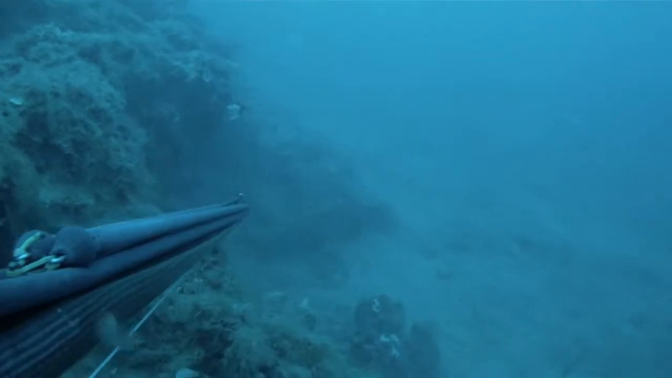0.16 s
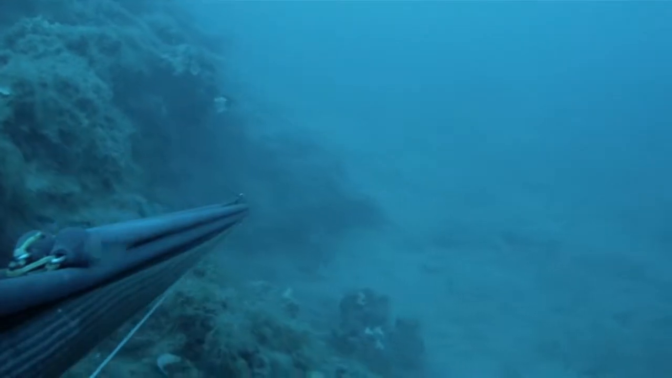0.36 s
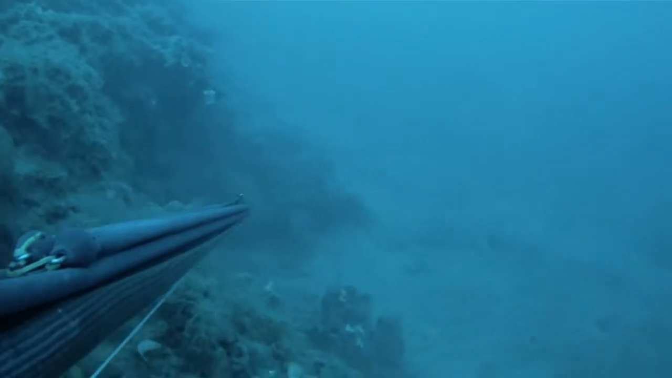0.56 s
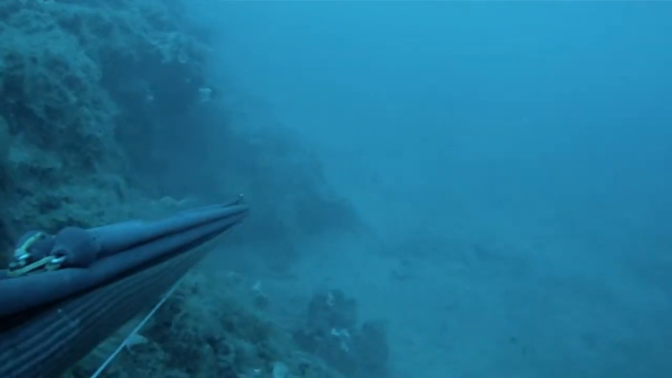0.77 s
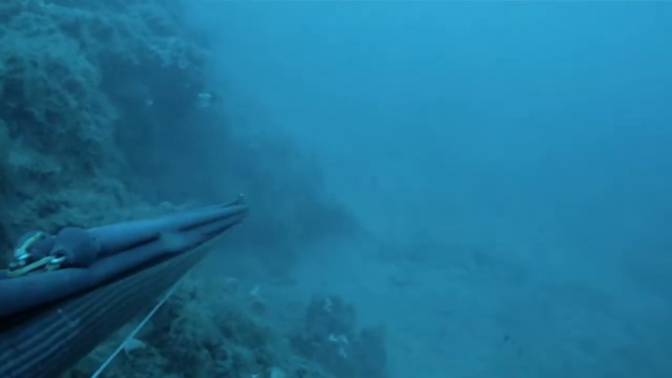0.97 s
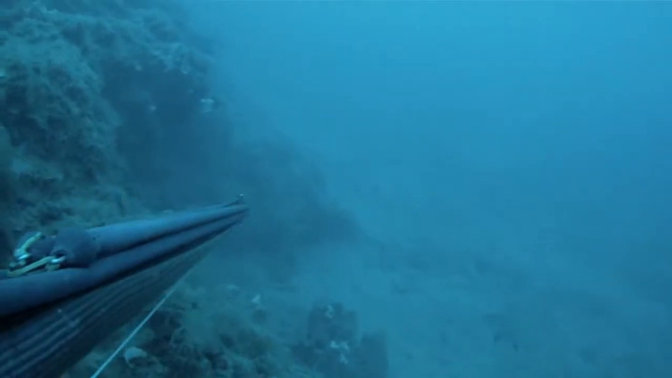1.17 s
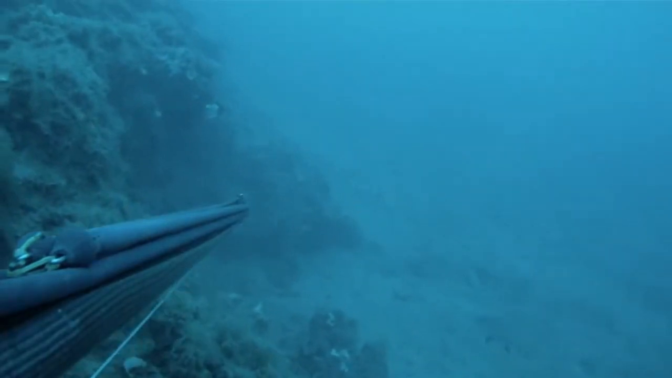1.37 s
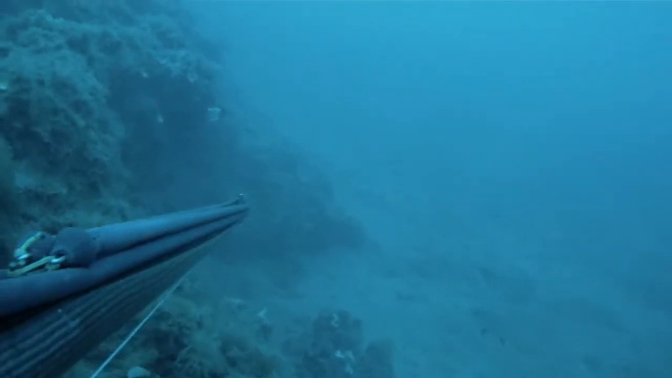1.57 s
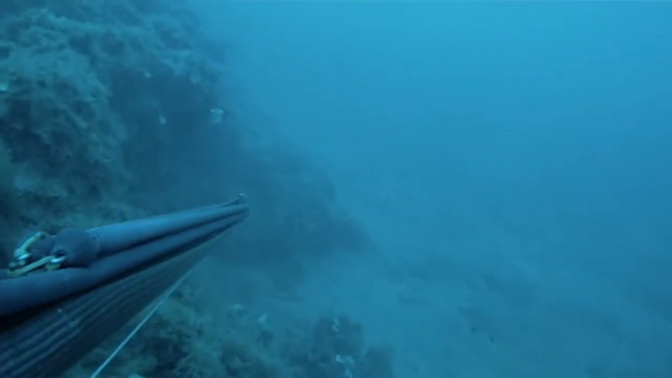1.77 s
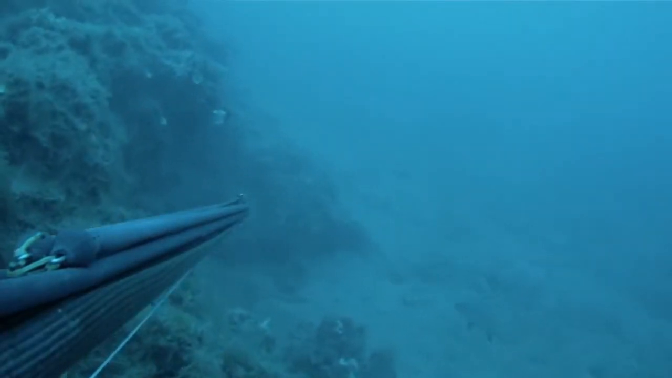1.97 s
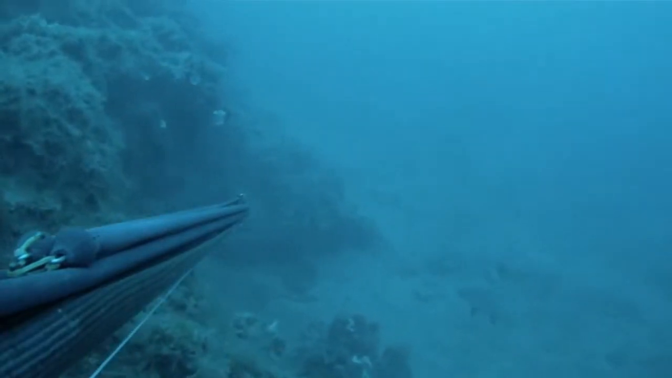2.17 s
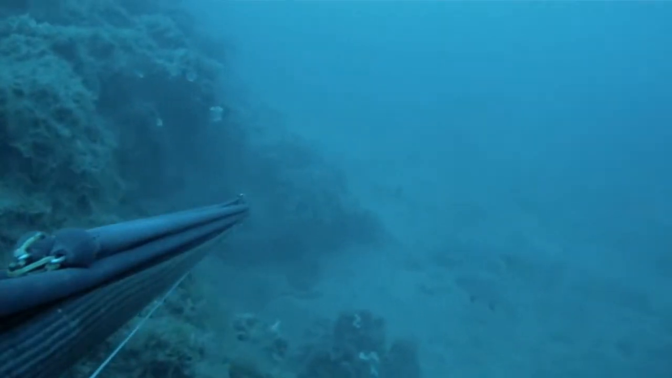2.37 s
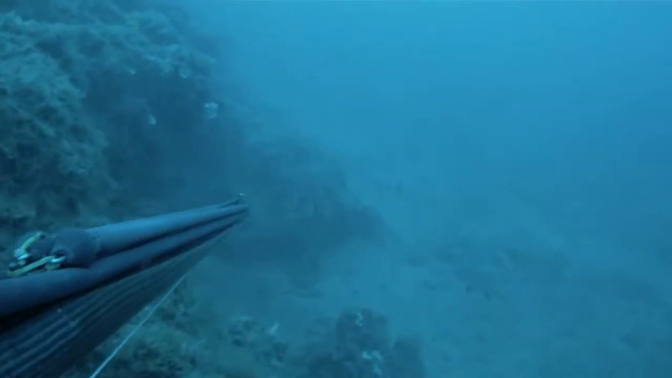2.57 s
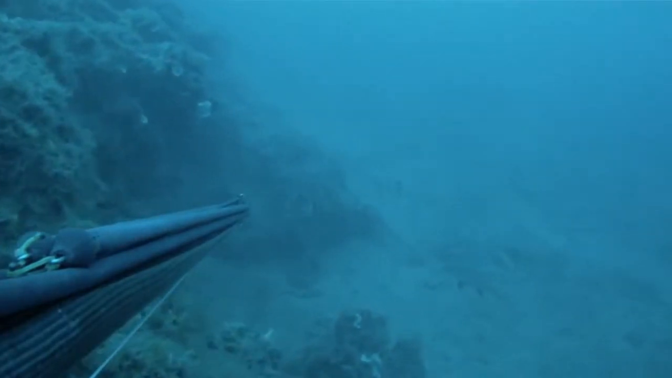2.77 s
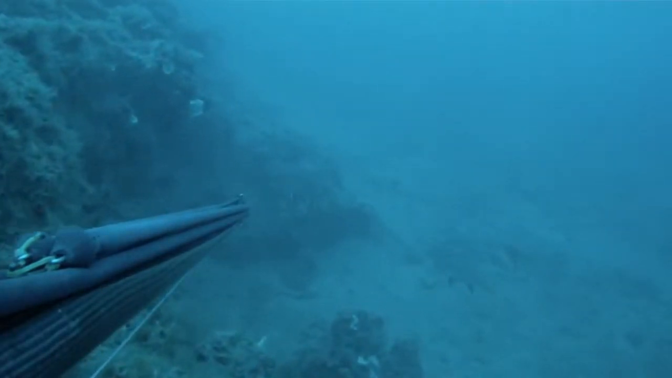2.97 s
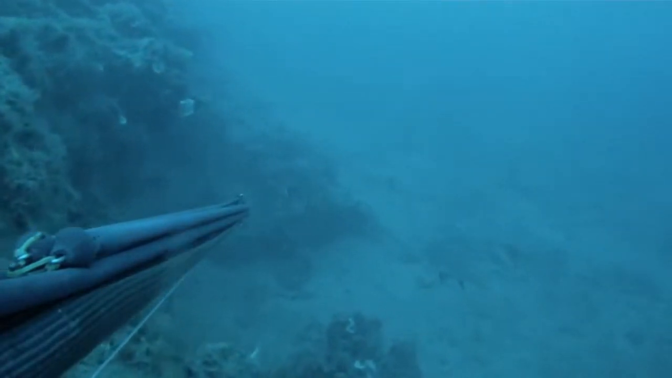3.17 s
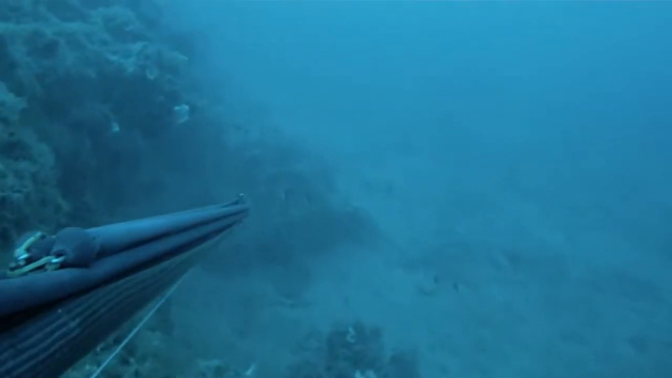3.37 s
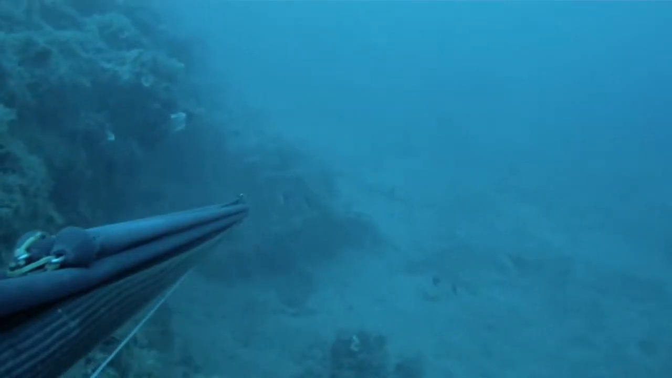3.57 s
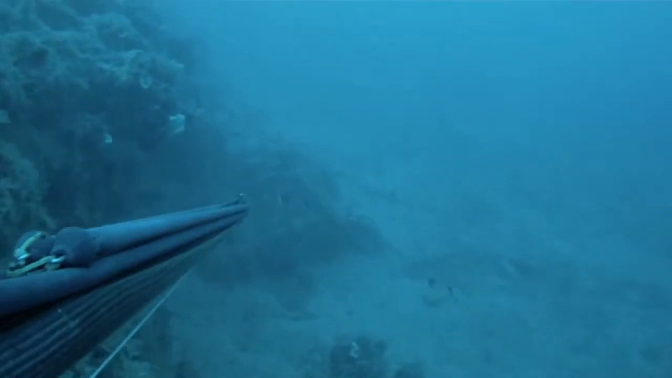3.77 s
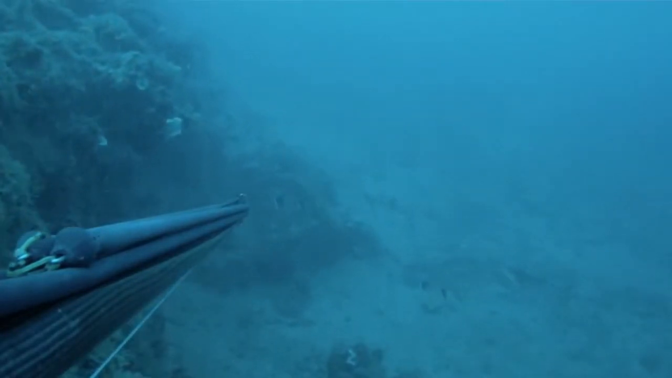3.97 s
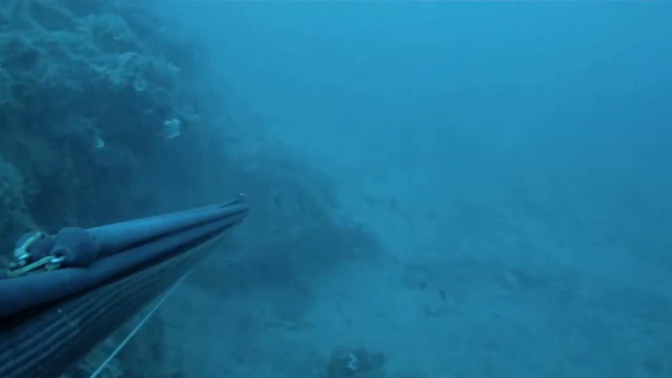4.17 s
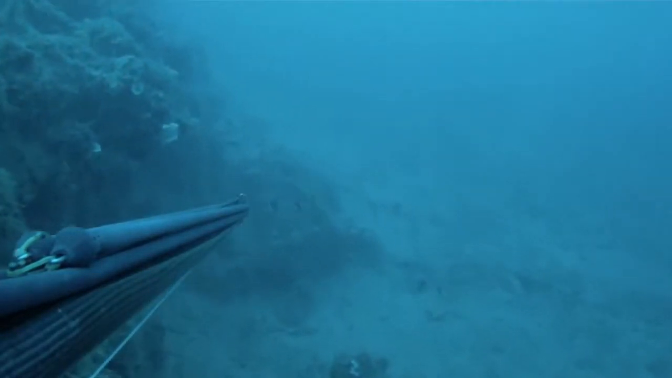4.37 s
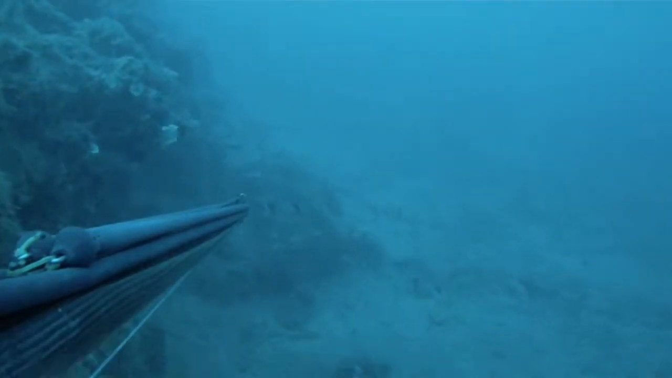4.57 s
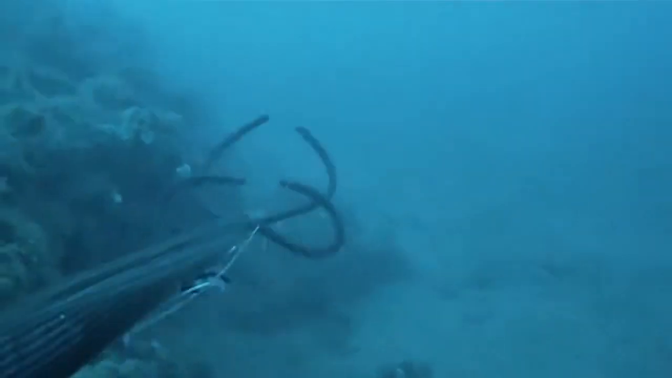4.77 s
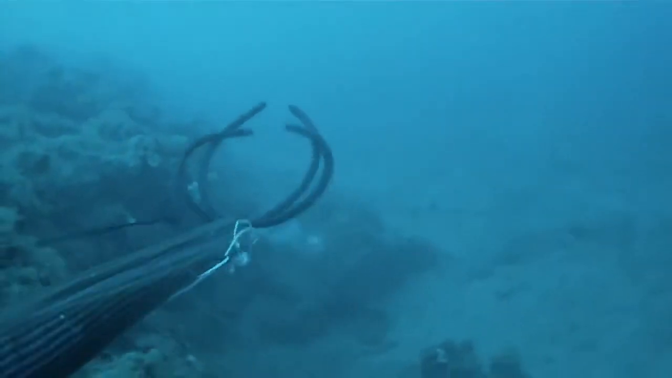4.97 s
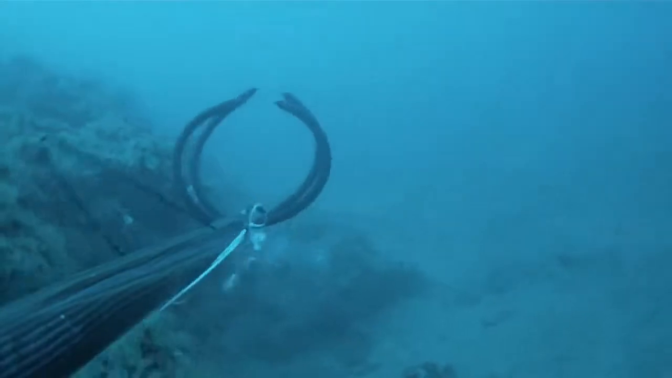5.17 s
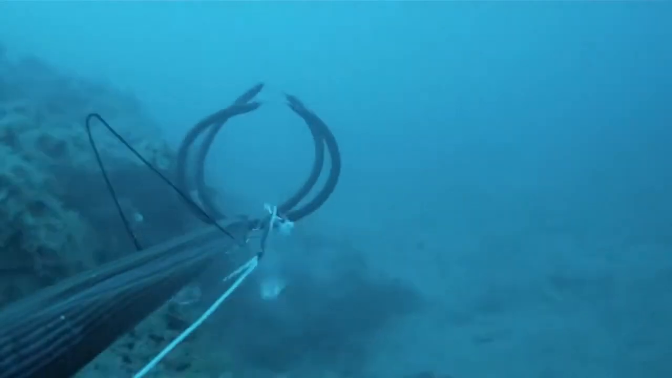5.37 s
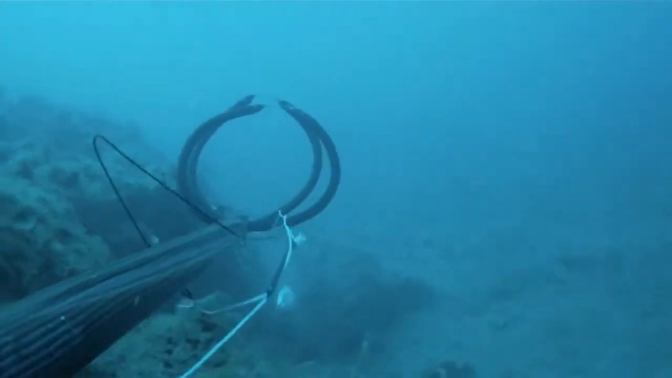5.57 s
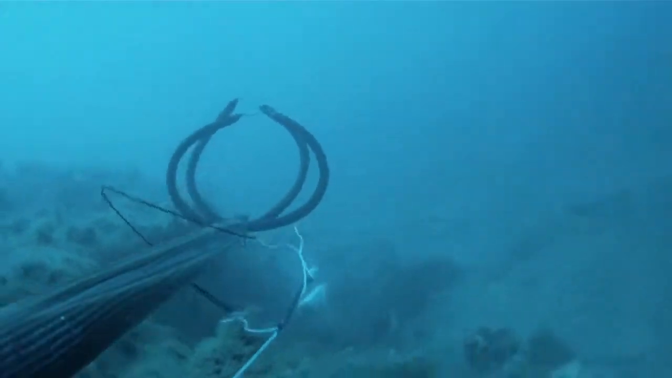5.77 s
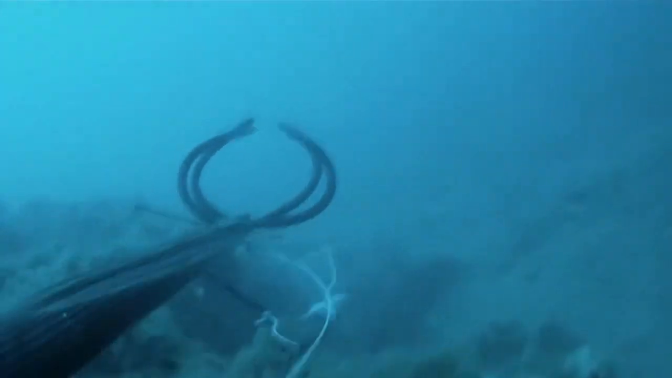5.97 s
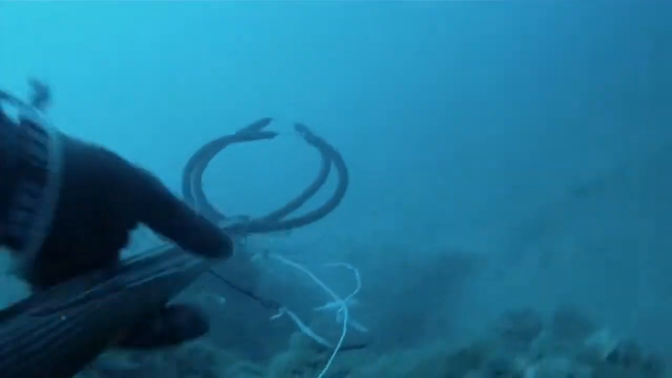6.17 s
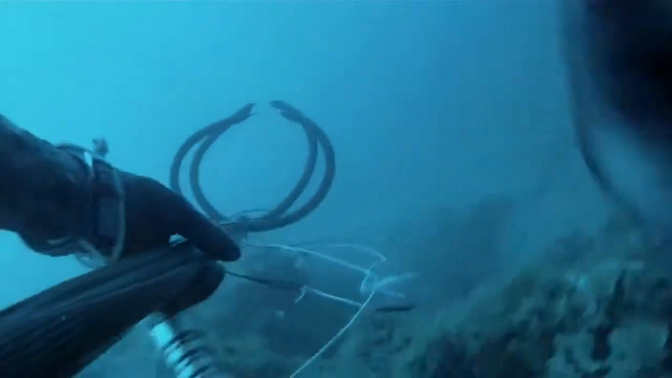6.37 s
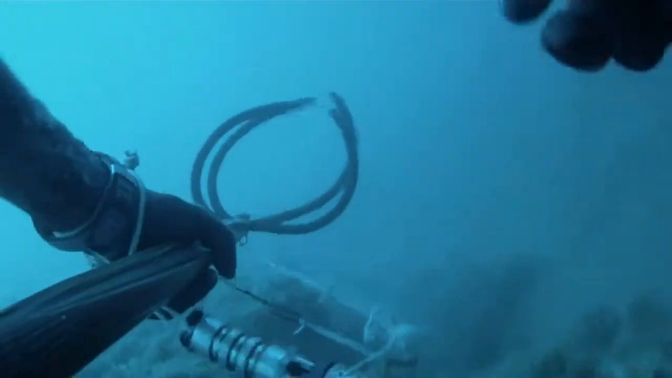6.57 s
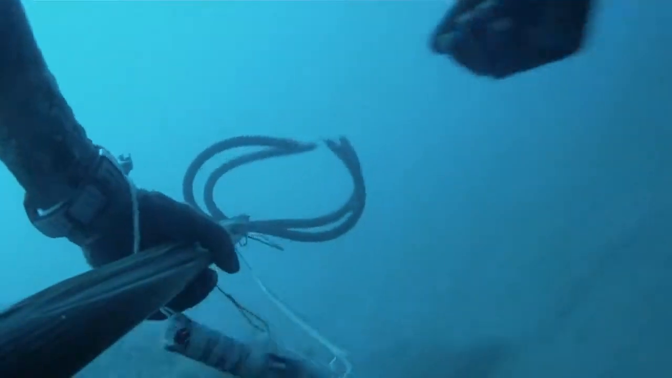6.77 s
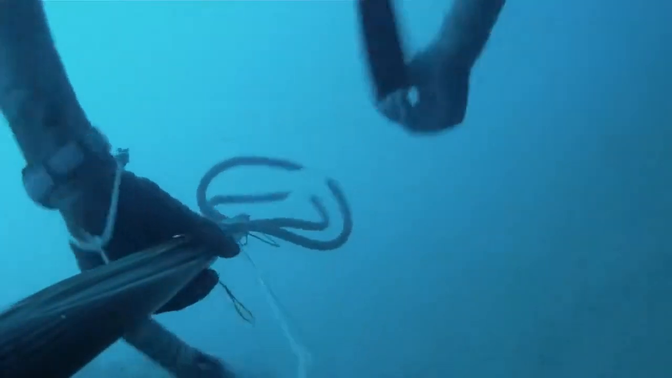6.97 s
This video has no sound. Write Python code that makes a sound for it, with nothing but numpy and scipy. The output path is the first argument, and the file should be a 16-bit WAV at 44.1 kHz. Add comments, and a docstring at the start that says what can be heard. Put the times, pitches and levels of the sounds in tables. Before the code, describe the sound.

Faint underwater hiss with tiny shrimp clicks, then a speargun fires with a loud rattling snap, followed by knocks and rubbing.

```python
"""Speargun shot over a reef

A camera in a plastic housing rides on a speargun. Countless far snaps merge into a hiss, near shrimp
ping in the housing's resonances, and a faint hum sits underneath. The gun fires at 4.6 s: the spear
grates along its track and the jolts overload the microphone, which clips and cuts out. Then water
rushes past the moving gun while line and hands rub and knock it."""
import sys
import numpy as np
from scipy import signal
from scipy.fft import rfft, irfft, next_fast_len
from scipy.io import wavfile
from scipy.ndimage import uniform_filter1d, map_coordinates

SR = 44100
rng = np.random.default_rng(int(sys.argv[2]) if len(sys.argv) > 2 else 0)


def store_pcm(level_fs):
    """Save levels as 16-bit WAV."""
    pcm = np.round(np.clip(level_fs, -1, 1) * 32767).astype(np.int16)
    wavfile.write(sys.argv[1], SR, np.atleast_2d(pcm).T)


N = 310023
TIME = np.arange(N) / SR


def amp(db):
    return 10 ** (np.asarray(db) / 20)


def fader(rows):
    """A level in dB for every sample, gliding between (seconds, dB) points."""
    return np.interp(TIME, *np.transpose(rows))


def wobble(rate):
    """A smooth random curve through rate points a second."""
    return map_coordinates(rng.standard_normal(int(N * rate / SR) + 4), [TIME * rate])


def filtered(x, response):
    """Shape a track with a gain given as a function of frequency."""
    size = next_fast_len(N + SR // 2)
    return irfft(rfft(x, size) * response(np.fft.rfftfreq(size, 1 / SR)), size)[:N]


def rush(spectrum, peaks=(), lumps_db=0):
    """Noise of rms 1 with a (Hz, dB) colour and narrow peaks, roughened by lumps_db."""
    points_hz, points_db = np.transpose(spectrum)

    def colour(hz):
        peaks_db = sum(db / (1 + (2 * (hz - centre) / width) ** 2) for centre, width, db in peaks)
        return amp(np.interp(np.log(hz + 1), np.log(points_hz + 1), points_db) + peaks_db)

    noise = filtered(rng.standard_normal(N) * amp(lumps_db), colour)
    return noise / np.sqrt(np.mean(noise ** 2) + 1e-20)


def swells(events, rise_s, fall_s=None):
    """Gain that rises to each event, holds and falls; rise and fall are times for 60 dB."""
    gain = np.zeros(N)
    for start, db, hold, *own_fall in events:
        before = (start - TIME) / rise_s
        after = (TIME - start - hold) / (fall_s or own_fall[0])
        gain += amp(db - 60 * np.maximum(np.maximum(before, after), 0))
    return gain


def add(track, start, sound):
    """Mix a sound into a track at start seconds."""
    part = track[round(start * SR):][:len(sound)]
    part += sound[:len(part)]


# The sea's hiss through the housing. Each row: frequency in Hz, relative level in dB.
HISS_COLOUR = [(150, -50.5), (250, -18.5), (429, -13.5), (474, -10), (524, -11.5), (815, -8), (926, -3.5),
               (1110, -12), (1590, -7), (2000, -21.5), (2370, -19), (3100, -23), (4180, -20.5), (4960, -31),
               (7500, -39.5), (9750, -83), (16500, -120)]
# The housing's resonances. Each row: centre in Hz, width in Hz, boost in dB.
HOUSING_PEAKS = [(944, 85, 6), (1398, 120, 6), (1555, 76, 7.5), (2330, 90, 4), (4180, 130, 3.5)]
# The low bed of water on the housing. Each row: frequency in Hz, relative level in dB.
RUMBLE_COLOUR = [(12, -52), (20, -11), (44, -14.5), (184, -19.5), (218, -13), (300, -21.5), (390, -67),
                 (660, -120)]
def sea():
    """Countless far snaps merge into a hiss; water pushing the housing adds a rumble."""
    flicker_db = wobble(5.6) + 0.99 * wobble(63)
    hiss = amp(-52) * rush(HISS_COLOUR, HOUSING_PEAKS, flicker_db)
    return hiss + amp(-72.5) * rush(RUMBLE_COLOUR)


# The hum's fader ride. Each row: time in seconds, rms level in dB.
HUM_LEVELS = [(0, -77.5), (1.15, -74.5), (1.3, -68.5), (4.6, -71), (4.7, -86), (7.03, -100)]
def hum(hz=215.3):
    """A faint wavering tone that drops away at the shot."""
    level_db = fader(HUM_LEVELS) + 1.5 * wobble(5.4)
    return amp(level_db) * np.sqrt(2) * np.sin(2 * np.pi * hz * TIME)


# The nearest shrimp. Each row: start in seconds, level in dB, pitch in Hz.
NEAR_SNAPS = [(0.2929, -45, 3950), (0.6484, -43.5, 4200), (0.756, -44, 3430), (0.7753, -39, 3970),
              (1.005, -50, 4260), (1.2567, -55, 4060), (1.2692, -39, 4170), (1.665, -50, 3720),
              (1.8229, -46, 3730), (2.1287, -49, 3460), (2.3677, -45, 4150), (2.426, -41, 4150),
              (3.7036, -49, 3690), (4.0449, -48, 4190), (4.1047, -45, 3680), (4.1352, -48, 4170)]
def shrimp(far_count=24, ring_s=0.013, echo_s=0.008, echo_db=-7):
    """Each snap is a short two-tone ping with a second just behind; farther shrimp snap at random."""
    out, t = np.zeros(N), np.arange(SR // 50) / SR
    far = rng.uniform((0, -56, 3500), (N / SR, -51, 4300), (far_count, 3))
    for start, db, hz in [*NEAR_SNAPS, *far]:
        lower_hz = rng.uniform(0.83, 0.91) * hz
        ping = np.sin(2 * np.pi * hz * t) + 0.71 * np.sin(2 * np.pi * lower_hz * t)
        ping *= (1 - np.exp(-t / 0.00032)) * amp(-60 * t / ring_s)
        add(out, start, amp(db) * ping)
        add(out, start + echo_s, amp(db + echo_db) * ping)
    return out


# The gun's ringing modes. Each row: pitch in Hz, level in dB, seconds to fade 60 dB.
GUN_MODES = [(345, -16.5, 0.037), (600, -16.5, 0.14), (856.6, -4, 0.071), (936.3, 9, 0.029),
             (1050, 3, 0.024), (1281, -1, 0.044), (1571, 8.5, 0.019), (1790, -4.5, 0.042),
             (2380, -5, 0.054), (2720, -6, 0.032), (3170, -31, 0.02), (4030, 0.5, 0.021)]
def gun_ring(centre_hz, spread, contact_s, grip_s=0.11, attack_s=0.0003):
    """A rough contact shakes the modes near centre_hz; the ring comes out with a peak of 1."""
    t = np.arange(SR // 10) / SR
    ring = np.zeros(len(t))
    for hz, db, fade_s in GUN_MODES:
        mode_db = db + rng.normal(0, 4.9) - 10 * (np.log2(hz / centre_hz) / spread) ** 2
        ring += amp(mode_db - 60 * t / fade_s) * np.sin(2 * np.pi * hz * t)
    ring *= amp(-60 * t / grip_s) * (1 - np.exp(-t / attack_s))  # hand and water damp every mode
    slips = np.zeros(SR // 50)  # the contact is a handful of small slips
    count = len(slips[::19])
    slips[::19] = rng.uniform(0.29, 1, count) * rng.choice([-1, 1], count)
    ring = signal.fftconvolve(ring, slips[:round(contact_s * SR) + 1])
    low_cut = signal.butter(2, centre_hz / 2 ** (1.2 * spread), "high", fs=SR, output="sos")
    ring = signal.sosfilt(low_cut, ring)
    return ring / np.max(np.abs(ring))


# Spear, line, tackle and hands striking the gun. Each row: start in seconds, level in dB,
# centre pitch in Hz, spread in octaves, contact time in seconds.
BLOWS = [(0.803, -39, 304, 0.69, .004), (0.948, -36.5, 328, 0.7, .004), (2.975, -24, 800, 1.5, .0003),
         (4.6395, 7.5, 1310, 0.85, .0036), (4.659, 21, 1300, 1.1, .0068), (4.6781, 11.5, 1310, 1.5, .004),
         (4.6923, 13, 1200, 1.5, .005), (4.7074, 7.5, 1400, 1.5, .001), (4.7119, 8.5, 1400, 0.56, .006),
         (4.728, 10, 1200, 1, .006), (4.739, 6, 1400, 0.67, .0026), (4.746, 8, 1410, 0.6, .01),
         (4.758, 10.5, 1400, 0.52, .003), (4.7678, 6.5, 1390, 1.2, .004), (4.7748, 8, 1430, 0.94, .002),
         (4.7815, 12, 1490, 0.49, .004), (4.795, 2.5, 1530, 0.92, .004), (4.82, 2.5, 1440, 0.47, .004),
         (4.831, -2, 900, 0.7, .004), (4.847, -8, 807, 0.48, .004), (4.888, -7, 950, .6, .004),
         (4.891, -8, 3200, .17, .002), (4.931, -16, 1500, 0.49, .004), (4.992, -19, 923, 0.33, .01),
         (5.086, -27.5, 1390, 0.63, .004), (5.154, -24, 955, 0.55, .004), (5.215, -20, 884, 0.8, .004),
         (5.273, -25.5, 915, 0.68, .004), (5.434, -16, 1385, 0.23, .004), (5.443, -17, 960, 0.82, .004),
         (5.478, -16, 939, 0.46, .004), (5.5, -16, 940, 0.29, .004), (5.564, -23.5, 1350, 0.49, .004),
         (5.599, -23.5, 939, 0.6, .004), (5.822, -24, 800, 0.89, .002), (5.944, -29, 950, .4, .008),
         (6.013, -7, 1500, 0.91, .005), (6.0251, 2, 1840, 0.29, .0027), (6.033, 7, 1000, 1.3, .002),
         (6.12, -22, 1130, 1, .004), (6.34, -34, 893, 0.8, .004), (6.368, 17, 866, .5, .009),
         (6.404, 18, 880, 0.45, .004), (6.422, 6, 850, .3, .003), (6.442, 13, 860, 0.26, .004),
         (6.452, 1.5, 825, 0.3, .0038), (6.526, -15.5, 1480, 0.53, .004), (6.539, -13.5, 1520, 0.62, .004),
         (6.6026, 4, 1000, 1.3, .0004)]
def knocks(tick_count=10, thud_hz=480, soft_hz=2200, hard_hz=12700, hard_db=12):
    """Each blow rings the gun over a dull thud; only the heaviest keep their bright top."""
    out, t = np.zeros(N), np.arange(SR // 10) / SR
    # After the shot the loose line ticks on the barrel at random.
    ticks = [(start, db, 940, 0.6, 0.004)
             for start, db in rng.uniform((4.6, -31), (5.98, -26), (tick_count, 2))]
    for start, db, centre_hz, spread, contact_s in [*BLOWS, *ticks]:
        blow = gun_ring(centre_hz, spread, contact_s)
        thud_db = -24 + 14 * spread  # broader blows carry more weight
        add(blow, 0, amp(thud_db - 60 * t / 0.011) * np.sin(2 * np.pi * thud_hz * t))
        # The low-pass opens steeply, passing hard_hz at hard_db.
        cutoff_hz = soft_hz + (hard_hz - soft_hz) * np.exp((db - hard_db) / 0.5)
        pole = np.exp(-2 * np.pi * cutoff_hz / SR)
        add(out, start, amp(db) * signal.lfilter([(1 - pole) ** 2], [1, -2 * pole, pole ** 2], blow))
    # The stiff gun passes no slow push on to the housing.
    return filtered(out, lambda hz: (1j * hz / (230 + 1j * hz)) ** 2)


# Water rubbing the moving gun. Each row: time in seconds, level in dB.
FLOW_LEVELS = [(4.63, -91.5), (4.9, -42.5), (5.18, -44), (5.4, -40.5), (5.85, -43), (5.98, -37.5),
               (6.2, -48), (6.36, -64.5), (6.62, -51), (6.86, -44.5), (7.03, -38)]
# Line or glove sliding along the gun. Each row: start in seconds, level in dB, hold in seconds,
# seconds to fade 60 dB.
RUB_STROKES = [(4.645, -31.5, .015, .1), (4.79, -24, .02, .25), (4.87, -34, .02, .08),
               (5.44, -46, 0.083, .1), (6.023, -18, .061, .04), (6.09, -34, .02, .15),
               (6.39, -29.5, 0.071, .1), (6.52, -31, .035, .06), (6.61, -37, .045, .06)]
# The body of a gentle rub. Each row: frequency in Hz, relative level in dB.
RUB_COLOUR = [(150, -54), (250, -40.5), (449, -28.5), (601, -16), (784, -15.5), (945, -6.5), (1180, -19.5),
              (1550, -17.5), (1910, -29.5), (2530, -24.5), (3050, -34), (4300, -33), (6000, -81),
              (7800, -91.5), (13200, -120)]
# The scratch of a hard rub. Each row: frequency in Hz, relative level in dB.
SCRATCH_COLOUR = [(1060, -13.5), (1800, -0.5), (2760, -12), (4190, -17), (4760, -15.5), (6660, -25),
                  (8900, -52), (13000, -48.5), (15800, -61.5)]
def rubbing(full_scratch_db=-13.5):
    """Water, line and glove rub the gun in quick lumps; the harder the rub, the scratchier."""
    gain = amp(fader(FLOW_LEVELS)) + swells(RUB_STROKES, rise_s=0.06)
    lumps_db = 3 * wobble(120) + 3.2 * wobble(26)
    body = rush(RUB_COLOUR, HOUSING_PEAKS[:3], lumps_db)
    scratch = rush(SCRATCH_COLOUR, lumps_db=lumps_db)
    scratch_share = amp(-4) * np.minimum(gain / amp(full_scratch_db), 1) ** 0.89
    return gain * (body + scratch_share * scratch)


# Bursts of metal on metal. Each row: start in seconds, level in dB, hold in seconds.
GRATE_BURSTS = [(4.64, -6, .003), (4.66, -8, .125), (6.033, -3, .002)]
# The tone of the grating. Each row: frequency in Hz, relative level in dB.
GRATE_COLOUR = [(350, -36), (600, -6), (856, -2), (1130, -6), (1540, -1), (5580, -36), (9000, -60),
                (15800, -48)]
def spear():
    """The shaft grates along its track in a bright crackle that starts and stops short."""
    crackle = rush(GRATE_COLOUR, lumps_db=5 * wobble(400) + 3 * wobble(90))
    return swells(GRATE_BURSTS, rise_s=0.006, fall_s=0.006) * crackle


# Jolts of the gun. Each row: start in seconds, level in dB, hold in seconds.
JOLTS = [(4.66, -39, .14), (5.03, -55, .07), (5.2, -60, .04), (5.87, -62, .06), (6.012, -21, 0.024),
         (6.39, -38.5, 0.093), (6.605, -41, 0.0087), (6.97, -54, .04)]
# The deep whoosh of shoved water. Each row: frequency in Hz, relative level in dB.
SURGE_COLOUR = [(12, -51.5), (20, 5.5), (54, -2.5), (97, 3), (118, -7.5), (152, -10.5), (188, -8.5),
                (260, -10), (340, -45.5), (570, -120)]
def surges(rise_s=0.064, thump_hz=90, thump_s=0.12):
    """Each jolt thumps the housing, shoves water against it and leaves a swirling wake."""
    shove = swells(JOLTS, rise_s, fall_s=0.1)
    wake = amp(-13) * swells(JOLTS, rise_s, fall_s=0.81)
    thumps, t = np.zeros(N), np.arange(SR // 4) / SR
    for start, db, _ in JOLTS:
        add(thumps, start, amp(db + 5 - 60 * t / thump_s) * np.sin(2 * np.pi * thump_hz * t))
    return (shove + wake) * rush(SURGE_COLOUR) + thumps


def scene():
    """The reef bed and the gun, mixed in mono at the microphone."""
    return (sea() + hum() + shrimp() + knocks() + rubbing() + spear() + surges())[None]


# Moments when the overloaded microphone goes dead. Each row: start in seconds, length in seconds.
DROPOUTS = [(4.6682, 0.0081), (4.6816, 0.011), (4.6972, .0088), (4.722, 0.0045), (4.734, 0.0033),
            (4.743, .002), (4.7603, .003), (4.778, 0.0036), (6.0348, .0043)]
def microphone(x, jerk_db=-7.5, jerk_hz=220):
    """While cut out, it passes almost nothing but the jerk of its membrane settling."""
    gate, jerks, t = np.ones(N), np.zeros(N), np.arange(SR // 50) / SR
    jerk = -amp(jerk_db) * np.exp(-t / 0.0014) * np.sin(2 * np.pi * jerk_hz * t)
    for start, length in DROPOUTS:
        gate[round(start * SR):round((start + length) * SR)] = 0.0078
        add(jerks, start, jerk)
    return x * uniform_filter1d(gate, size=9) + jerks


# The camera's own hiss. Each row: frequency in Hz, relative level in dB.
CIRCUIT_COLOUR = [(4820, -36.5), (8200, -17), (8270, -30), (9000, -29), (10700, -12.5), (13300, -4.5),
                  (14700, -4.5), (15800, -14.5)]
def record(dry, whistle_hz=7865, max_duck_db=17, recovery_s=0.2, top_hz=16000):
    """The camera adds hiss and a thin whistle, ducks after overloads, clips and cuts the extreme top."""
    hiss = amp(-75.5) * rush(CIRCUIT_COLOUR)
    whistle = amp(-79) * np.sqrt(2) * np.sin(2 * np.pi * whistle_hz * TIME)
    x = microphone(dry[0]) + hiss + whistle
    excess = np.clip(np.abs(dry[0]) - 0.45, 0, 0.6)
    pole = np.exp(-1 / (recovery_s * SR))
    overload = signal.lfilter([1 - pole], [1, -pole], excess)
    x *= amp(-max_duck_db * np.tanh(overload / 0.1))
    x /= (1 + np.abs(x) ** 8) ** (1 / 8)  # soft clip
    x = filtered(x, lambda hz: np.clip((top_hz - hz) / 200, 0, 1))
    return np.clip(x, -1, 1)[None]


dry = scene()
out = record(dry)
store_pcm(out)
```